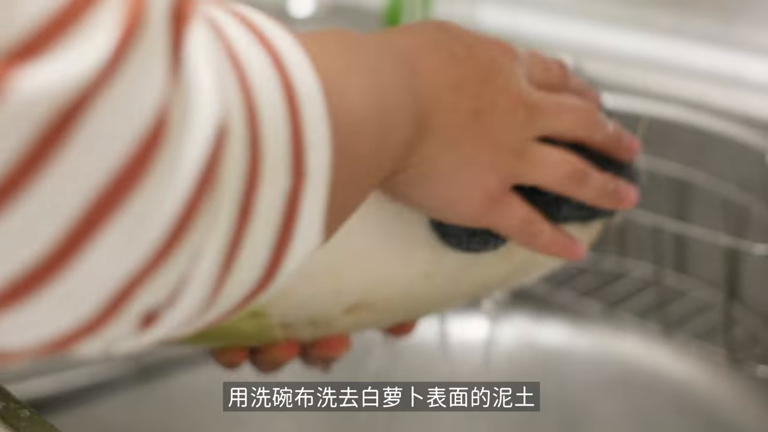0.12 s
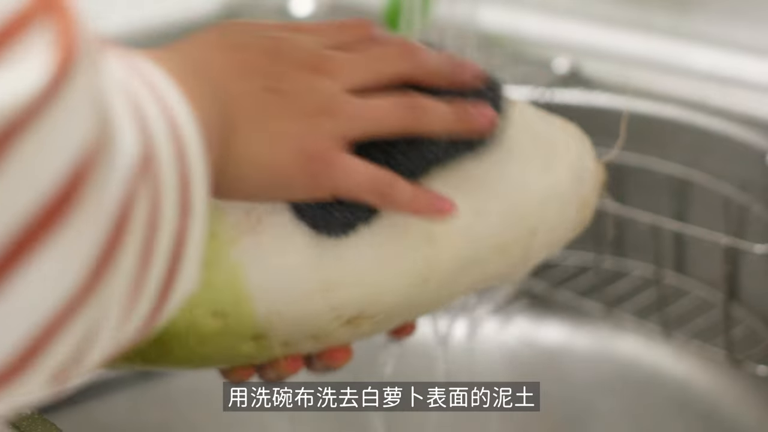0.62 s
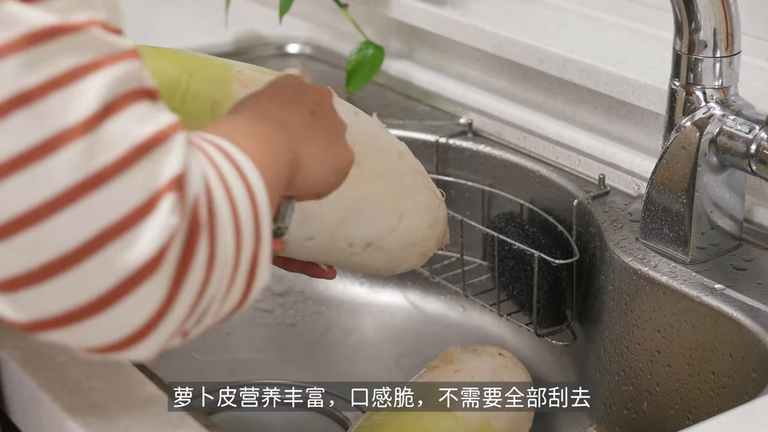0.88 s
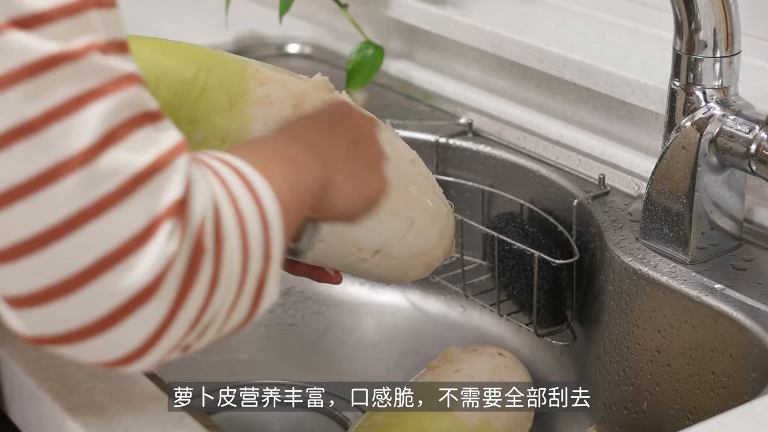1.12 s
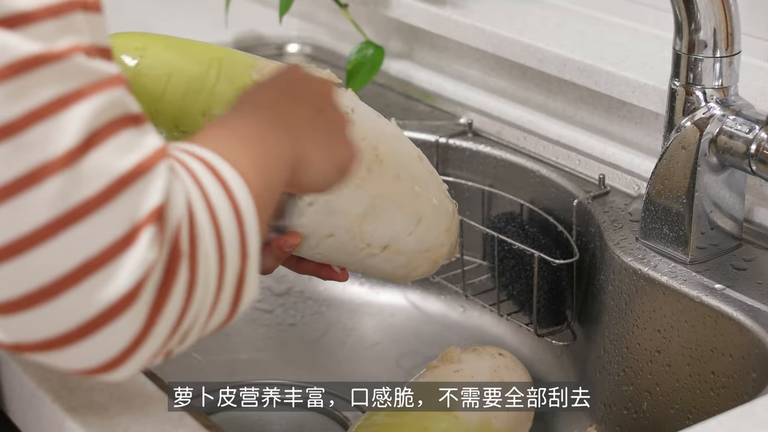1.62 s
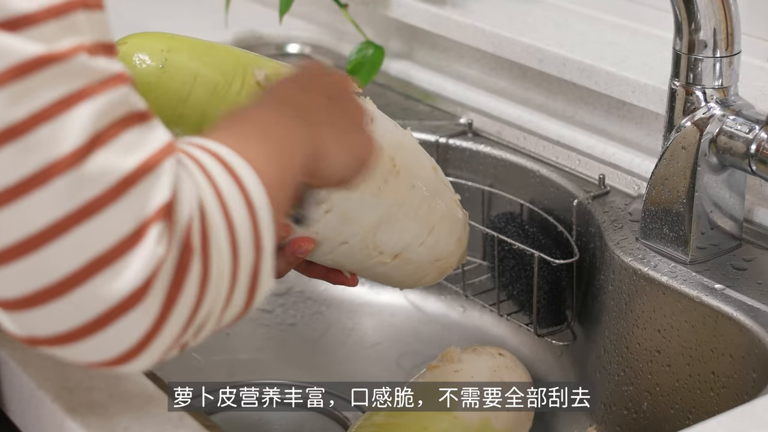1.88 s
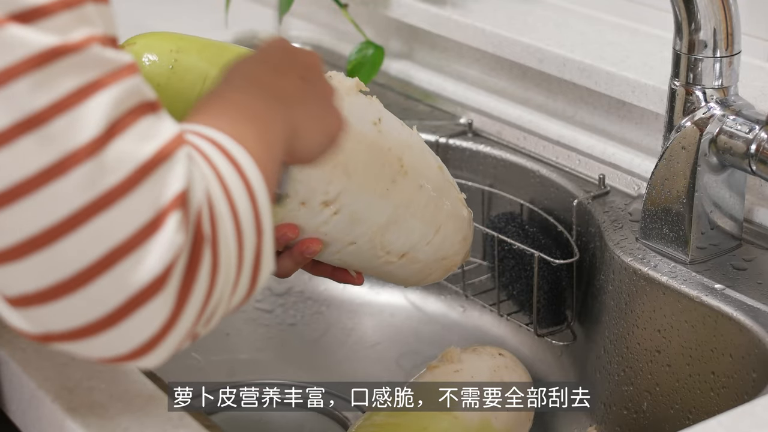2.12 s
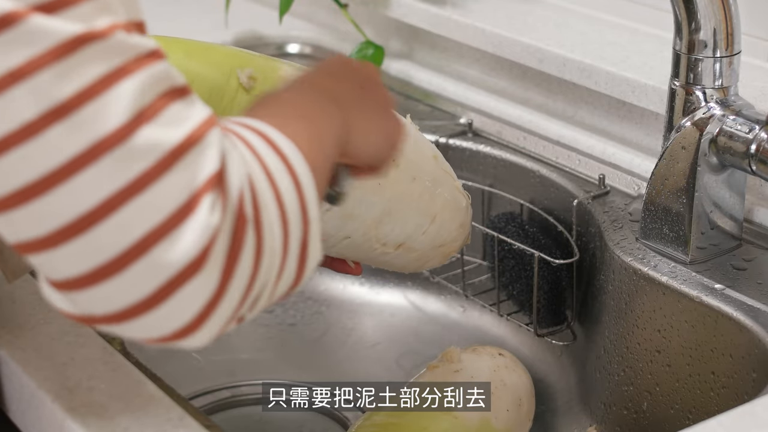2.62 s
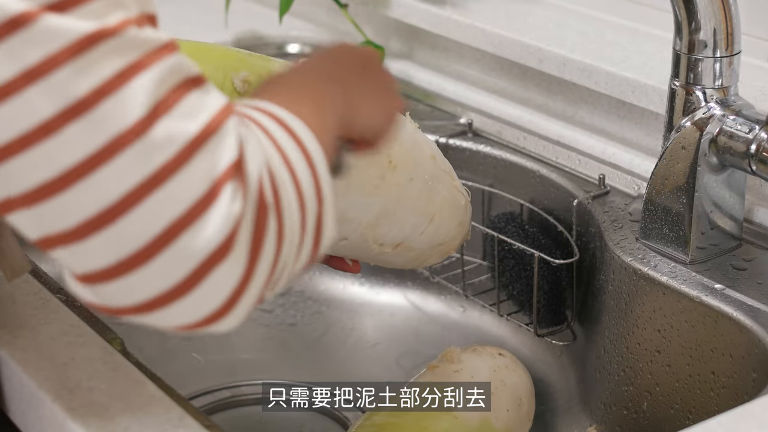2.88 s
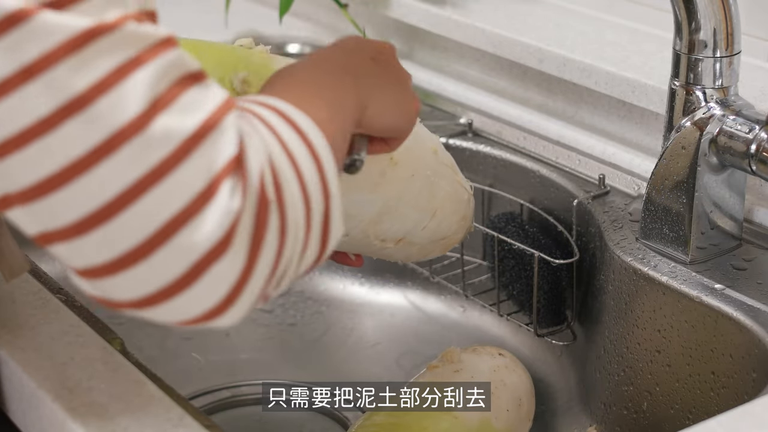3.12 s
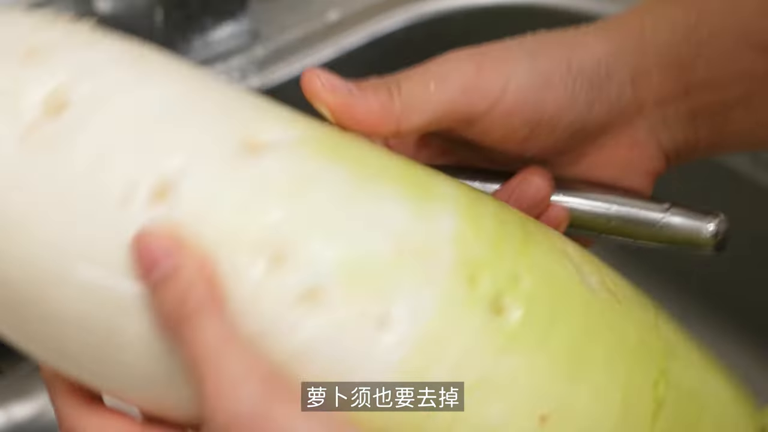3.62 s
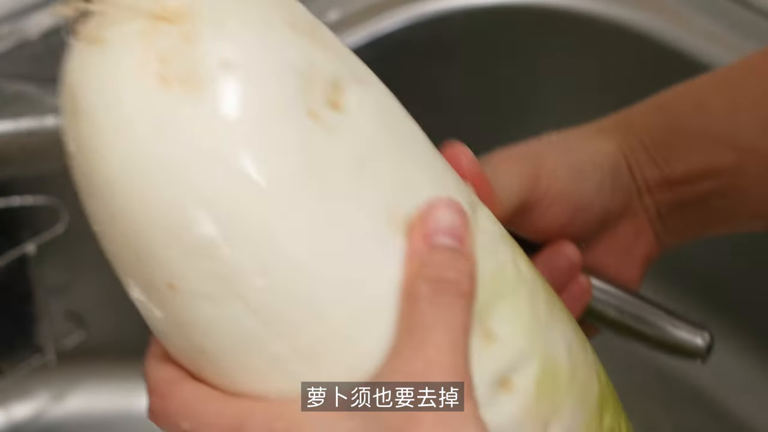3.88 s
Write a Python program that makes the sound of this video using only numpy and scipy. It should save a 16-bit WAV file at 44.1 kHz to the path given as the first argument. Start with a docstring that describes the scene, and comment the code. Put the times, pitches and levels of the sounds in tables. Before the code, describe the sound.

A metal spoon scrapes a radish in short, dry, ringing strokes, heard close in a small kitchen. First, tap water splashes and drums on a steel basin; last, near silence with a soft low thud.

```python
"""A metal spoon scrapes a radish in short strokes at a steel kitchen sink, heard close, with a brief small-room ring.
Before it a tap runs over the radish and a sponge, and drums on the basin; after it comes a quiet moment with a thud.
Scrapes are dense clicks ringing narrow resonances; water is fizzing clicks, hiss, short bursts and noise through
the basin's resonances. An appliance hums steadily below, at another pitch and level in the quiet moment."""
import sys
import numpy as np
from scipy import signal
from scipy.fft import rfft, irfft
from scipy.io import wavfile

SR = 44100
rng = np.random.default_rng(int(sys.argv[2]) if len(sys.argv) > 2 else 0)


def attenuation_scalar(level_db):
    """Turn a level in dB into a linear amplitude multiplier (20 dB per decade)."""
    decades = np.asarray(level_db, float) / 20
    return 10 ** decades


def bounce(signal):
    """Save signal as a 16-bit WAV file at the path given by the first command-line argument."""
    frames = np.transpose(np.atleast_2d(signal))
    limited = np.clip(frames, -1, 1)
    pcm = np.round(limited * 32767).astype(np.int16)
    wavfile.write(sys.argv[1], SR, pcm)


N = 176400

# Colour of the air at the sink and of the water's rumble. Each row: frequency in Hz, relative level in dB per Hz.
AIR_COLOUR = [(60, -48.5), (100, -2.5), (1070, -24), (5000, -40), (16200, -46)]
# Colour of the spoon's rasp and of its landings. Each row: frequency in Hz, relative level in dB per Hz.
RASP_COLOUR = [(200, 0.5), (614, -5), (1060, -26), (1300, 1), (3040, -5.5), (3470, -1.5), (5500, -1.5),
               (9500, -14.5), (16200, -22)]


def rms_one(x):
    """Scale to unit rms."""
    return x / np.sqrt(np.mean(x ** 2) + 1e-20)


def curve(rows):
    """Join (seconds, value) rows by straight lines, one value a sample."""
    s, values = np.transpose(rows)
    return np.interp(np.arange(N) / SR, s, values)


def between(t0, t1):
    """One from t0 to t1 (s), with 0.3 ms edges."""
    t = np.arange(N) / SR
    return np.clip(np.minimum(t - t0, t1 - t) / 3e-4, 0, 1)


def drift(rate_hz):
    """Slow chance of spread 1: noise through two equal low-pass poles at rate_hz."""
    r = np.exp(-40 * np.pi * rate_hz / SR)  # one value every 20 samples
    chance = rng.standard_normal(N // 20 + 3002)
    slow = signal.lfilter([1], [1, -2 * r, r * r], chance)[3000:]
    return np.interp(np.arange(N) / 20, np.arange(len(slow)), rms_one(slow))


def resonance(x, hz, width_hz):
    """Two-pole peak of gain 1: a fixed ringing mode."""
    r = np.exp(-np.pi * max(width_hz, 5) / SR)
    top = np.array([1, 0, -1]) * (1 - r * r) / 2
    return signal.lfilter(top, [1, -2 * r * np.cos(2 * np.pi * hz / SR), r * r], x + 1e-18)


def gliding(x, hz, width_hz):
    """Peak of gain 1 whose centre follows hz sample by sample: shift down, smooth, shift back."""
    turn = np.exp(2j * np.pi * np.cumsum(hz) / SR)
    r = np.exp(-np.pi * max(width_hz, 5) / SR)
    return 2 * np.real(turn * signal.lfilter([1 - r], [1, -r], x / turn + 1e-18))


def colour(x, spectrum):
    """Weight a long sound by a spectrum, 60 dB down beyond its ends."""
    hz, db = np.transpose(spectrum)
    grid = np.log(np.arange(len(x) // 2 + 1) * SR / len(x) + 1)
    weight = attenuation_scalar(np.interp(grid, np.log(hz), db, left=-60, right=-60))
    return irfft(rfft(x) * weight, len(x))


def grains(rate, spread_db):
    """Random clicks, rate per second, of uneven size and either sign; rms 1."""
    sizes = attenuation_scalar(spread_db * np.minimum(rng.exponential(1, N), 5)) * rng.choice([-1, 1], N)
    return rms_one(sizes * (rng.random(N) < rate / SR))


def burst(s, db, t60, noise):
    """Noise that rises within 1.6 ms at s and dies away by 60 dB in t60 seconds."""
    t = np.arange(N) / SR - s
    return noise * np.clip(t / 0.0016, 0, 1) * attenuation_scalar(db - 60 * np.clip(t, 0, 1) / max(t60, .005))


def hum(hz, db):
    """The appliance: a steady low sine of rms db from a random phase."""
    turns = hz * np.arange(N) / SR + rng.random()
    return np.sqrt(2) * attenuation_scalar(db) * np.sin(2 * np.pi * turns)


def air():
    """Steady coloured noise of the air at the sink."""
    return attenuation_scalar(-51.5) * rms_one(colour(rng.standard_normal(N), AIR_COLOUR))


def thud():
    """The radish shifts in the hand: a noise burst rings one low mode."""
    knock = burst(3.695, -17.5, 0.22, rng.standard_normal(N))
    return resonance(knock, 140, 12.0)


def quiet_moment():
    """Coloured noise, a faint hum and the thud."""
    # Colour of the quiet. Each row: frequency in Hz, relative level in dB per Hz.
    quiet_colour = [(65, -19), (130, -8), (400, -16), (1000, -31.5), (16200, -45.5)]
    still = attenuation_scalar(-57.5) * rms_one(colour(rng.standard_normal(N), quiet_colour))
    return still + hum(61, -52) + thud()


def room(x):
    """The small room: a diffuse noise tail that dies away, the treble sooner."""
    t60_s, tail_db = 0.33, -6
    t = np.arange(SR // 2) / SR
    low = np.convolve(rng.standard_normal(len(t)), [.5, .5], "same")
    high = rng.standard_normal(len(t)) * attenuation_scalar(-40 * t / t60_s)
    tail = (low + high) * attenuation_scalar(-60 * t / t60_s) * np.clip(t / 0.012, 0, 1)
    return attenuation_scalar(tail_db) * signal.fftconvolve(x, tail / np.sqrt(np.sum(tail ** 2)))[:N]


def rumble():
    """Low coloured noise under the running water."""
    return attenuation_scalar(-43.5) * rms_one(colour(rng.standard_normal(N), AIR_COLOUR))


def basin(x, damping):
    """The steel basin's low resonances, wavering as water sloshes over it."""
    # Basin modes. Each row: centre in Hz, width in Hz before damping widens or narrows it, relative level in dB.
    basin_modes = [(92, 34, -10), (168, 41, -11.5), (210, 28.6, 3), (257.2, 24.6, 4.5), (397, 21, 1.5),
                   (505, 90, -18)]
    slosh_share, slosh_hz = .012, 8
    out = 0
    for hz, width_hz, db in basin_modes:
        centre = hz * (1 + slosh_share * drift(slosh_hz))
        wide = gliding(x, centre, 2 * damping * width_hz)
        out = out + attenuation_scalar(db) * gliding(wide, centre, damping * width_hz)
    return out


def drumming():
    """The stream is steady noise into the basin modes."""
    return attenuation_scalar(-31) * rms_one(basin(rng.standard_normal(N), 0.86))


def slopping():
    """Water slops onto the basin: single blows, the water's load widening the modes."""
    # Slops. Each row: time in seconds, size of the blow in dB.
    slops = [(0.6, 20), (0.626, 23), (0.748, 23.5), (0.762, 24)]
    blows = np.zeros(N)
    for s, db in slops:
        blows[int(s * SR)] = attenuation_scalar(db)
    return basin(blows, 2.22)


def squirting():
    """Squirts from the sponge: short noise bursts through broad peaks."""
    # Squirts. Each row: start in seconds, burst level in dB ahead of the peak filter, peak in Hz.
    squirts = [(.058, -17.5, 12200), (0.075, -9, 3970), (0.1105, -7.5, 4400), (0.434, -14, 4400),
               (0.545, -12.5, 6900), (0.624, -8, 4100)]
    noise = rng.standard_normal(N)
    return sum(resonance(burst(s, db, 0.03, noise), hz, 0.24 * hz) for s, db, hz in squirts)


def splashing():
    """Hiss and patchy fizzing bubbles on the skin: clicks dealt among 20 short rings, bass to treble."""
    # Flow of water. Each row: time in seconds, splash level in dB.
    flow = [(.04, -36), (.09, -31.5), (.19, -37), (.28, -32.5), (.38, -35), (.46, -32.5)]
    # Colour of the splash. Each row: frequency in Hz, relative level in dB per Hz.
    splash_colour = [(600, -12), (1100, -13), (1500, -4), (6000, 3), (9500, -3.5), (16200, -4)]
    fizz_db, cycles = -5.5, 2.9  # bubble clicks against hiss; decay of a ring in cycles
    clicks = grains(1100 * attenuation_scalar(5.7 * drift(36)), 4.5)
    dealt = rng.integers(0, 20, N)
    patches = [attenuation_scalar(3 * drift(24)) for _ in range(7)]  # neighbouring bands swell together
    hiss = 0.28 * rng.standard_normal((2, N))
    fizz = 0
    for k, hz in enumerate(np.geomspace(700, 17000, 20)):
        drive = attenuation_scalar(fizz_db) * clicks * (dealt == k) + hiss[k % 2]
        ring = resonance(drive, hz, 2 * hz / cycles / np.pi)
        fizz = fizz + patches[k // 3] * ring / np.sqrt(hz)
    drops = 0.32 * grains(900, 5.0)
    return attenuation_scalar(curve(flow)) * rms_one(colour(rms_one(fizz) + drops, splash_colour))


def washing():
    """The tap over radish, sponge and basin."""
    return splashing() + squirting() + drumming() + slopping() + rumble()


def landing():
    """The spoon lands on the skin: sharp bursts of treble-lifted rasp noise."""
    # Landings. Each row: time in seconds, level in dB.
    taps = [(0.7924, -36), (1.0843, -33.5), (1.4043, -31), (1.9803, -41.5), (2.9057, -42), (2.9134, -33.5),
            (3.4173, -40), (3.4482, -33.5)]
    crack = colour(rng.standard_normal(N), RASP_COLOUR)
    crack = rms_one(signal.lfilter([1, -.5], [1], crack))
    return sum(burst(s, db, 0.065, crack) for s, db in taps)


def stroke_pressure(t, length):
    """Pressure of one stroke, a bell peaking at t = 0, its rise quicker than its fall."""
    rise, fall = 0.45 * length, 0.55 * length
    phase = np.clip(np.where(t < 0, t / rise, t / fall), -1, 1)
    return np.cos(np.pi / 2 * phase) ** 2.18


def scraping():
    """Each stroke drags the edge over the skin: dense catches ring spoon and radish, gripped differently each time."""
    # Strokes. Each row: time of most pressure in seconds, pressure in dB, length in seconds,
    # singing edge in Hz before it wanders, sizzle lift in dB (a steeper spoon sizzles more and its edge sings louder).
    strokes = [(0.817, -28.5, 0.083, 5100, 7.5), (0.86, -28, 0.087, 5240, 10),
               (0.899, -32.5, 0.057, 5580, 7), (1.145, -24, 0.17, 5100, 5), (1.451, -32, 0.08, 5100, 6),
               (1.513, -32.5, 0.12, 5430, 8), (1.746, -28.5, 0.12, 5070, 5.5), (1.799, -35, 0.1, 5020, 7),
               (2.015, -29, 0.096, 5100, 5), (2.068, -34, 0.052, 4835, 9.5), (2.168, -32, 0.11, 4970, 7),
               (2.263, -33.5, 0.13, 5120, 9), (2.378, -32.5, 0.12, 5180, 14), (2.471, -33, 0.13, 5010, 8.5),
               (2.599, -35.5, 0.15, 5170, 11.5), (2.694, -35, 0.11, 5320, 7.5),
               (2.741, -34, 0.036, 4930, 7.5), (2.8, -38.5, 0.09, 5020, 11.5),
               (2.953, -29.5, 0.08, 5020, 6), (3.203, -30, 0.16, 5090, 6), (3.463, -31, 0.062, 4600, 8),
               (3.509, -25, 0.11, 4900, 10.5)]
    # Modes of spoon and radish. Each row: centre in Hz before grip and wander, width in Hz, relative level in dB.
    modes = [(611, 55, -13), (1308, 40, 0), (1610, 95, -11), (2490, 95, -5.5), (3390, 31, -4.5),
             (3590, 143, -1), (8860, 120, -15), (12200, 82, -15), (6090, 180, -7), (6730, 90, -4.5),
             (7640, 79, -8)]
    # Firmness of hold: it damps the spoon and lets the radish ring. Each row: time in seconds,
    # dB gained by the modes below heft_hz and lost by those above and by the edge.
    heft_rows = [(1.2, 2), (2.2, 0.5), (3.25, 0), (3.47, 3.5)]
    heft_hz, sizzle_hz = 2000, 8300
    rasp_db, spoon_db, edge_db, edge_width_hz = -7, 12.5, -3.5, 56
    grip_spread_db, grip_shift = 2, .007  # chance level and share of pitch, drawn per stroke and mode
    wander_share, wander_hz, flicker_db = 0.011, 23.4, 1  # modes drift and swing as the contact moves

    catches = grains(5000, 2.5) * attenuation_scalar(1.5 * drift(38))  # uneven catches with judder
    rasp = rms_one(colour(catches, RASP_COLOUR))
    sizzle = signal.sosfilt(signal.butter(2, sizzle_hz, "high", fs=SR, output="sos"), rasp)
    grips = rng.standard_normal((len(strokes), len(modes), 2))
    wander = [1 + wander_share * drift(wander_hz) for _ in range(len(modes) + 1)]  # the last is the edge's
    flicker = [attenuation_scalar(flicker_db * drift(wander_hz)) for _ in modes]
    heft_db = curve(heft_rows)
    out = np.zeros(N)
    for (s, db, length, edge_hz, sizzle_db), grip in zip(strokes, grips):
        i = int((s - 0.45 * length) * SR)
        t = np.arange(i, i + int(length * SR) + 4000) / SR - s  # 4000 samples let the modes ring out
        span = slice(i, i + len(t))
        heft = heft_db[int(s * SR)]
        pressure = attenuation_scalar(db) * stroke_pressure(t, length)
        drive = pressure * catches[span]
        edge_gain = attenuation_scalar(edge_db + 0.72 * sizzle_db - heft)
        rings = edge_gain * gliding(drive, edge_hz * wander[-1][span], edge_width_hz)
        for k, (hz, width_hz, level_db) in enumerate(modes):
            gain = attenuation_scalar(level_db + grip_spread_db * grip[k, 0] + heft * np.sign(heft_hz - hz))
            centre = hz * (grip_shift * grip[k, 1] + wander[k][span])
            rings += (-1) ** k * gain * gliding(drive * flicker[k][span], centre, width_hz)
        lift = attenuation_scalar(sizzle_db) * flicker[-1][span] - 1
        rough = pressure * (rasp[span] + lift * sizzle[span])
        out[span] += attenuation_scalar(spoon_db) * rings + attenuation_scalar(rasp_db) * rough
    return out + landing()


def scene():
    """The three moments, cut one after the other, with air and hum alone in the gap before the spoon."""
    wash_end_s, scrape_start_s, scrape_end_s = .778, .791, 3.655
    spoon = scraping()
    mix = hum(50.9, -45.5) * between(-1, scrape_end_s)
    mix += air() * between(wash_end_s, scrape_end_s)
    mix += quiet_moment() * between(scrape_end_s, 5)
    mix += washing() * between(-1, wash_end_s)
    mix += (spoon + room(spoon)) * between(scrape_start_s, scrape_end_s)
    return mix[None]


def roll_off(x):
    """The treble ends steeply here."""
    return signal.sosfilt(signal.butter(12, 15900, fs=SR, output="sos"), x)


def record(dry):
    """The microphone signal with a small steady offset."""
    mix = dry - .0016
    return roll_off(mix)


dry = scene()
out = record(dry)
bounce(out)
```